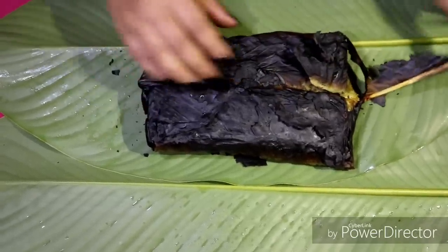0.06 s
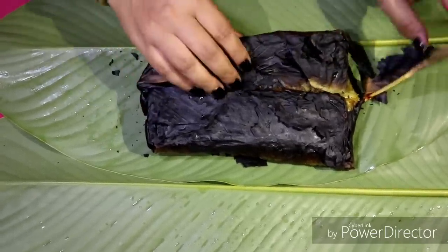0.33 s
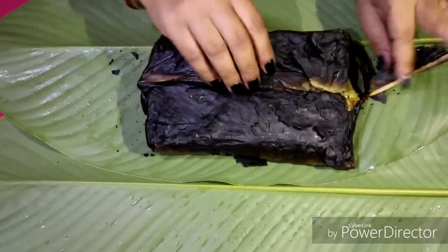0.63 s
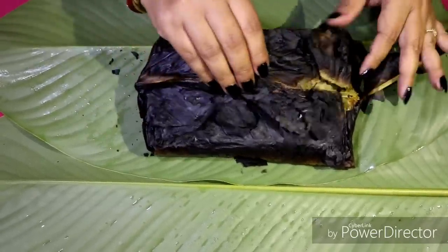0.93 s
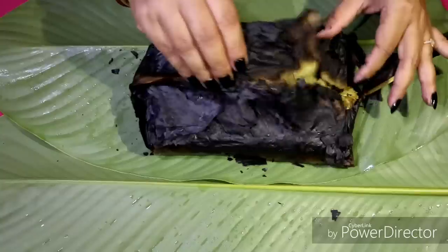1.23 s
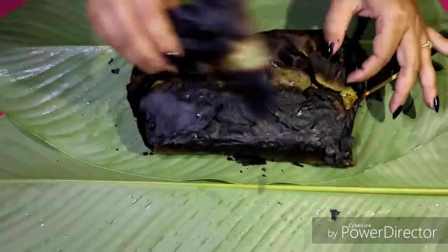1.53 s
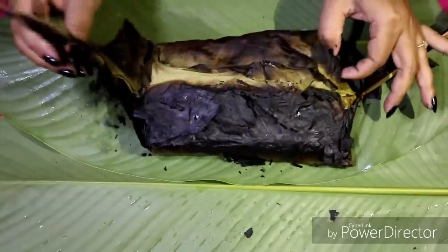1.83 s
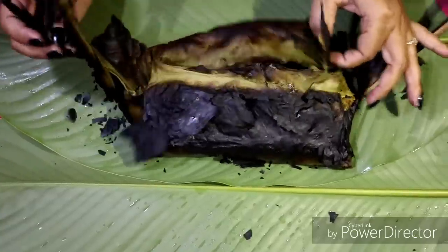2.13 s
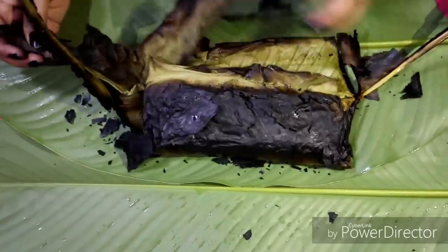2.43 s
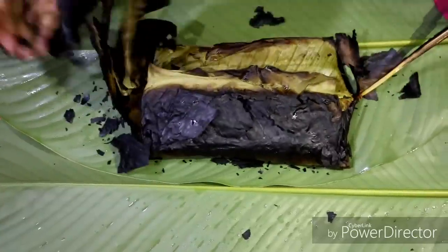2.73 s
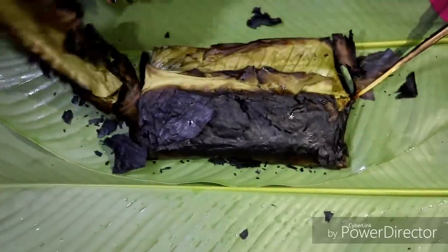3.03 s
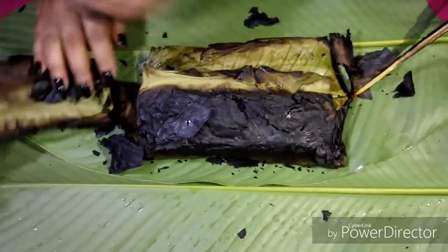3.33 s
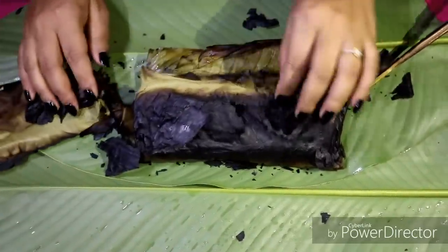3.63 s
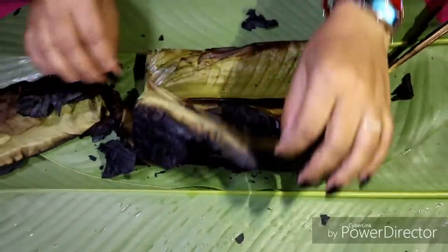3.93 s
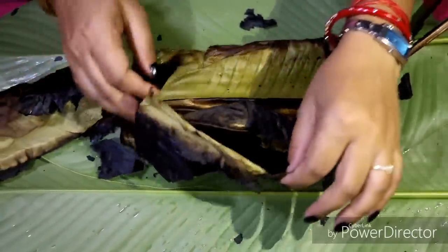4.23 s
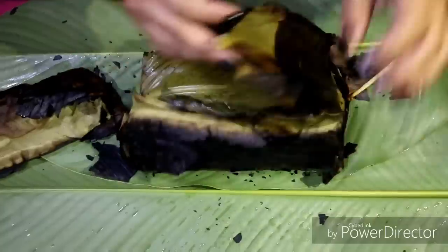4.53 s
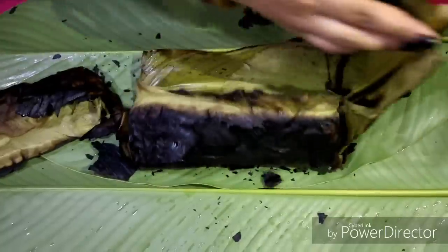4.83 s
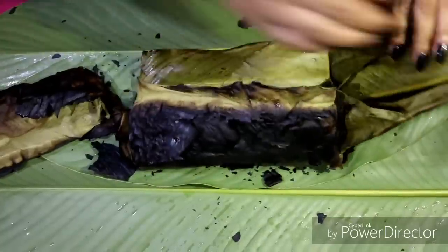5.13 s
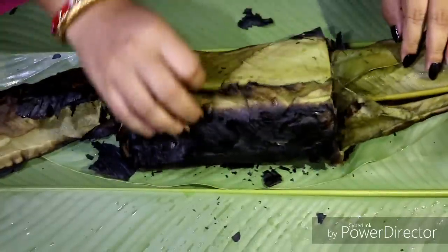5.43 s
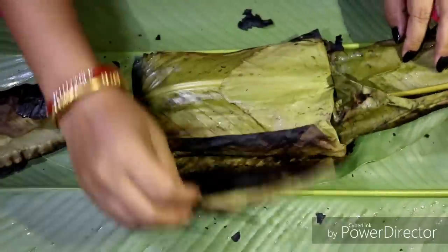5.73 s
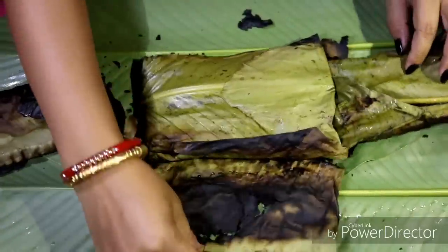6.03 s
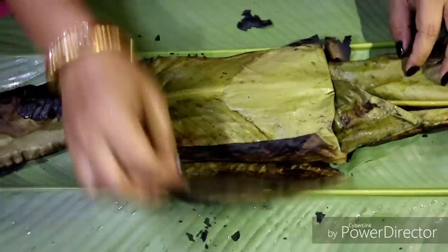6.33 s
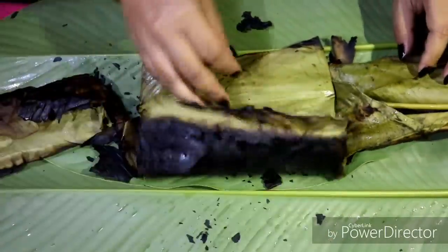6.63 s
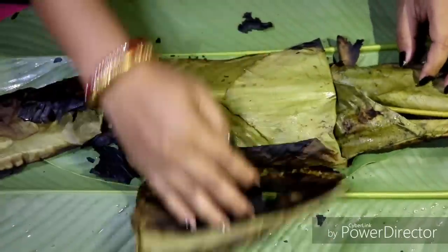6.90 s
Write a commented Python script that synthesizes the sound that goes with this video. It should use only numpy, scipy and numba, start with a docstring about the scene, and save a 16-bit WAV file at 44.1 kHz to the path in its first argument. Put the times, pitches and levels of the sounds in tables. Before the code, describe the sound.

Brittle charred leaves crackle and snap in uneven bursts as a parcel is unwrapped by hand, heard from close by. The first few seconds are busy with crisp tearing and crunching; lighter leaf scrapes and dull little knocks follow, then another bout of crackling near the end. The small kitchen adds very little echo, only a quiet hiss, a faint low hum and a very high insect-like pulse.

```python
"""Peeling a charred leaf parcel

Hands peel the charred leaf wrapping off a roasted parcel, close to a phone in a kitchen. Each pull
sets off a crackle of tiny fractures while the limp inner leaves rub; folds crunch, flakes snap, loose
leaves scrape and the parcel bumps. A small room answers faintly, over steady hiss, a low hum that
swells twice and a thin pulsing chirp."""
import sys
import numpy as np
from scipy import signal
from scipy.fft import rfft, irfft, next_fast_len
from scipy.io import wavfile
from scipy.ndimage import uniform_filter1d
from numba import njit

SR = 44100
rng = np.random.default_rng(int(sys.argv[2]) if len(sys.argv) > 2 else 0)


def transcribe(signal):
    """Save signal, clipped to [-1, 1], as a 16-bit WAV file at the path in sys.argv[1]."""
    frames = np.atleast_2d(signal).T
    limited = np.clip(frames, -1, 1)
    pcm = np.round(limited * 32767).astype(np.int16)
    wavfile.write(sys.argv[1], SR, pcm)


N = 315888
GRAIN = 1024  # samples in one fracture
SIDES = np.array([[1], [-1]])  # left, right
FLAKE_HZ = 3280  # pitch of a typical flake

# single flakes breaking off: (time [s], level [dB], pitch [Hz], ring strength [dB], treble [dB])
SNAPS = [(0.049, -31.5, 4500, 12, -3), (0.2858, -17, 2230, 10, -4), (0.3446, -17.5, 3880, 0, 0),
         (0.355, -15.5, 3490, -6, 12), (0.363, -20, 9500, 8, 11), (.3988, -25, 6100, 11, 3),
         (.43, -27, 4500, -2, 4), (.463, -31, 3000, 0, 0), (.5141, -42, 5500, 3, 8),
         (0.441, -22, 2560, 11, 9), (0.6365, -24.5, 2060, 9, 7), (.716, -31, 7500, 8, 8),
         (0.7282, -25, 4150, 10, 6), (0.7502, -26, 2960, 9, 0), (0.813, -27, 7000, 4, 8),
         (0.8391, -17.5, 3020, 5, -12), (0.872, -31, 2900, 12, -3), (.9465, -28, 3500, 4, -6),
         (0.994, -22, 1400, 13, 1), (0.999, -21, 4000, -3, -2), (1.006, -21.5, 3060, 9, -4),
         (1.041, -27, 3600, 8, -7), (1.0533, -19, 8400, 10, -1), (1.106, -29, 2240, 8, -3),
         (1.1412, -21.5, 6240, 4, 2), (1.1673, -19.5, 8100, 3, 2), (1.1798, -21.5, 4560, 2, 9),
         (1.248, -22, 7500, 17, 6), (1.3496, -24.5, 4780, 4, 5), (1.4451, -19, 2050, 4, -9),
         (1.4951, -26, 7960, 0, 13), (1.5484, -18, 8000, 10, 9), (1.5804, -25, 7900, 15, 8),
         (1.6, -32, 3820, 9, 12), (1.644, -30.5, 5500, 19, -14), (1.674, -24.5, 7400, 9, -1),
         (1.712, -19.5, 3580, 27, 11), (1.721, -18, 8180, -10, 19), (1.7645, -24, 4000, 11, -2),
         (1.8, -24, 4000, -3, 9), (1.8257, -24, 4400, 6, 1), (1.835, -22, 4180, 12, 7),
         (1.8642, -25, 5340, 0, 9), (1.9386, -34, 3420, 7, -1), (1.9697, -16, 3730, 10, -1.5),
         (2.0014, -17.5, 3800, 17, 0), (2.1392, -12.5, 4700, 5.5, -2), (2.2426, -22.5, 1390, 6, -11),
         (2.2842, -27.5, 2300, 6, -8), (2.29, -29.5, 1510, 13, -2), (2.3092, -29, 4400, 4, 7),
         (2.411, -31, 3180, 4, -3), (2.4606, -27, 4560, 7, 7), (2.535, -30, 2170, 10, -10),
         (2.564, -20, 2920, 8, -2), (2.5765, -20, 2180, 16, 0), (2.663, -31, 4500, 5, -4),
         (2.701, -30, 7490, -9, 0), (2.7058, -23, 4500, 11, 9), (2.7555, -14.5, 7700, 2, 9),
         (2.846, -28.5, 8000, 0, 11), (2.8807, -28, 4500, 7, 4), (2.894, -21, 8000, 5, 7),
         (2.9787, -24, 5240, 13, -5), (3.0338, -18, 4600, 10, -5), (3.062, -19, 4600, 14, -3),
         (3.106, -21, 5030, 15, 6), (3.108, -20, 7750, -4, 3), (3.1153, -29, 7000, 1, 10),
         (3.149, -28, 4200, 6, 5), (3.161, -22.5, 5000, 8, 7), (3.166, -23, 5350, 12, 7),
         (3.2687, -21.5, 4700, 11, -2), (3.3112, -24.5, 5700, 10, -11), (3.4392, -26, 4610, 12, -6),
         (3.2903, -30, 2500, -2, -2), (3.333, -27, 4440, 16, 1), (3.357, -31.5, 2000, 4, 1),
         (3.3748, -40, 3500, 2, -9), (3.3869, -30.5, 4500, 5, 14), (3.4733, -26, 3030, 17, -12),
         (3.512, -27.5, 2500, 7, -7), (3.6022, -22.5, 1700, 18, -3), (3.6118, -22.5, 4850, 17, 4),
         (3.6286, -30, 2000, 3, 7), (3.642, -35, 3500, 0, 3), (3.6635, -30.5, 3500, -6, -3),
         (3.731, -29.5, 2140, 15, 0), (3.816, -31, 3500, 6, -4), (3.8847, -20, 4690, 9, 10),
         (3.938, -23, 4770, 14, 2), (3.953, -28, 1630, 15, 2), (3.983, -30, 2000, 3, 0),
         (3.9996, -23, 2690, 6, 5), (4.0285, -20.5, 4870, 9, -7), (4.0788, -24, 4150, 9, 2),
         (4.1392, -30, 7000, 14, 0), (4.333, -27.5, 4440, 21, -2), (4.7626, -31, 4560, 9, 6),
         (4.779, -23, 3660, -13, -13), (4.8205, -30, 8000, 2, 4), (4.8298, -31, 5340, 3, 1),
         (4.884, -24, 5860, 4, 4), (4.9206, -25.5, 4520, 4, -7), (4.945, -25.5, 3430, 8, 5),
         (4.9937, -26, 3300, 12, 0), (5.007, -32, 3000, 10, -7), (5.0434, -23, 3450, -5, 4),
         (5.0507, -24.5, 3140, 0, -9), (5.1221, -20, 6850, 11, 7), (5.1583, -35, 3400, 3, -2),
         (5.181, -33, 3400, 6, -5), (5.2699, -27.5, 3600, 1, -4), (5.4089, -31, 2970, -6, -9),
         (5.4207, -30, 4560, 1, -1), (5.4981, -18, 2840, 7, -10), (5.507, -30, 3500, 1, -2),
         (5.58, -27.5, 3000, -1, 1), (5.5168, -22, 2760, 7, 2), (5.556, -27.5, 2870, 15, -15),
         (5.6171, -18.5, 2160, 15, -18), (5.6255, -20, 2250, 12, -10), (5.7968, -25, 1370, 16, -6),
         (5.8255, -25, 2950, 2, -3), (5.8675, -27, 3000, -5, -2), (5.887, -30, 3500, 4, 2),
         (5.897, -21, 2600, 13, -4), (5.9043, -13.5, 2550, 8.5, -2.5), (5.954, -22, 2630, -9, -6.5),
         (5.975, -21, 3280, 8, 5), (5.986, -20.5, 3140, 2, -7), (6.037, -28, 3230, 8, -8),
         (6.0421, -24, 2200, 10, -5), (6.0659, -24, 3190, 11, -7), (6.0772, -18, 4200, 9.5, -7),
         (6.1247, -29, 3000, -2, 1), (6.1929, -29.5, 7670, 0, 8), (6.238, -30.5, 1490, 1, -16),
         (6.2713, -26, 2820, 12, -2), (6.321, -32, 1800, -1, -12), (6.3941, -27, 1350, 19, -5),
         (6.441, -34.5, 3320, 9, -5), (6.565, -30, 2700, 20, 0), (6.5883, -27.5, 2720, 8, -1),
         (6.686, -23, 8300, 10, 7), (6.7197, -29.5, 8050, 21, 5), (6.91, -32, 2000, 9, -14),
         (6.9694, -31, 2500, 0, -1), (7.0228, -29, 3000, 7, 0), (7.0289, -25, 3140, 9, -2),
         (7.0482, -23, 3530, -1, -2), (7.0613, -22.5, 3920, 3, -4), (7.0683, -24.5, 4000, 8, 2),
         (7.107, -24.5, 8100, 14, 9), (7.1147, -22.5, 4960, 16, 12), (7.138, -26, 3070, 24, -12),
         (7.146, -24.5, 3000, 13, -18)]
# tone colour of the leaves: (frequency [Hz], level [dB])
LEAF_SPECTRUM = [(59, -42), (100, -12), (150, -8), (373, -12), (433, -8), (930, -7), (2580, -1), (3540, 0),
                 (6020, -6), (7940, -4), (9020, -8), (12700, -11), (15000, -14.5), (16000, -23)]


def undb(db):
    """Decibels to gain."""
    return 10 ** (np.asarray(db) / 20)


def unit(x):
    """Scale to rms 1."""
    return x / np.sqrt(np.mean(x ** 2) + 1e-20)


def freqs(size):
    """Frequencies of a spectrum, the first kept above zero."""
    return np.maximum(np.arange(size // 2 + 1) * SR / size, 1)


def shape(points, hz):
    """Gain of a (frequency [Hz], level [dB]) curve at the given frequencies."""
    at, db = np.transpose(points)
    return undb(np.interp(np.log(hz), np.log(at), db))


def causal(gain):
    """Minimum-phase spectrum with this gain: sharp attack, ringing after."""
    cepstrum = irfft(np.log(gain + 1e-6))
    half = len(cepstrum) // 2
    cepstrum[1:half] *= 2
    cepstrum[half + 1:] = 0
    return np.exp(rfft(cepstrum))


def resonance(hz, centre_hz, q):
    """Gain of one damped mode."""
    return 1 / np.sqrt(1 + (q * (hz / centre_hz - centre_hz / hz)) ** 2)


def wander(rate_hz):
    """Random modulation: glides from value to value, spread near 1."""
    return np.interp(np.arange(N) / SR * rate_hz, np.arange(2048), rng.standard_normal(2048))


def envelope(start, length, attack_s=0.018, release_s=0.011):
    """Rise, hold, die away; by default as quick as a pull of the hand."""
    t = np.arange(N) / SR - start
    return np.clip(t / attack_s, 0, 1) * np.exp(-np.clip((t - length) / release_s, 0, 20))


def mic_pair(mid, side, hz, bass_width, wide_hz=5400, lag_s=.00002):
    """Spectra at two close microphones: narrow bass, wide treble, the left a little late."""
    width = np.clip(bass_width + (1 - bass_width) * hz ** 2 / (hz ** 2 + wide_hz ** 2), 0, 1)
    delay = np.exp(-1j * np.pi * hz * lag_s * SIDES)
    return (mid + SIDES * width * side) / np.sqrt(1 + width ** 2) * delay


def room_tone(level_db=-43.3):
    """The steady hiss of the kitchen."""
    # colour of the room noise: (frequency [Hz], level [dB])
    colour = [(25, -26), (50, -16.5), (110, -4.5), (320, -6), (480, -10.5), (900, -18), (2200, -13.5),
              (2950, -4.5), (3400, -3.5), (4200, -12), (5300, -4), (7000, -21), (11300, -11),
              (12400, -18.5), (15200, -17), (15900, -40)]
    size = next_fast_len(N, real=True)
    hz = freqs(size)
    mid, side = rfft(rng.standard_normal((2, size)))
    spectrum = mic_pair(mid, side, hz, bass_width=0.49, wide_hz=4400) * shape(colour, hz)
    return unit(irfft(spectrum, size)[:, :N]) * undb(level_db)


def hum(pitch_hz=147.4, drift=0.011, floor_db=-66, waver_db=2):
    """A low, wavering hum that swells twice, as of a motor far away."""
    # swells of the hum: (start [s], length [s], level [dB])
    swells = [(5.55, 0.23, -57), (6.32, 0.29, -58.5)]
    phase = 2 * np.pi * np.cumsum(pitch_hz * (1 + drift * wander(9))) / SR
    gain = undb(floor_db)
    for start, length, db in swells:
        gain = gain + undb(db) * envelope(start, length, attack_s=0.12, release_s=0.24)
    return np.sqrt(2) * np.sin(phase) * gain * undb(waver_db * wander(12))


def chirp(pitch_hz=12500, level_db=-46, pulse_hz=7.297, first_s=.124, half_s=0.03, waver_db=6.0):
    """A thin, very high chirp in even pulses, as of a bush cricket outside."""
    size = next_fast_len(N, real=True)
    band = resonance(freqs(size), pitch_hz, q=8) ** 2
    rasp = unit(irfft(rfft(rng.standard_normal((2, size))) * band, size)[:, :N])
    cycles = (np.arange(N) / SR - first_s) * pulse_hz
    from_peak_s = ((cycles + .5) % 1 - .5) / pulse_hz
    return rasp * np.exp(-(from_peak_s / half_s) ** 2) * undb(level_db + waver_db * wander(8.8))


def room(x, t60=0.11, wet_db=-16.0, damp_hz=6000, predelay_s=.005):
    """The kitchen walls return a faint, short, duller tail."""
    t = np.arange(SR // 2) / SR
    tail = rng.standard_normal((2, len(t))) * np.exp(-np.log(1000) * t / t60) * (t > predelay_s)
    tail = signal.sosfilt(signal.butter(1, damp_hz, fs=SR, output="sos"), tail)
    tail = unit(tail) / np.sqrt(len(t))
    return x + undb(wet_db) * signal.oaconvolve(x, tail, axes=1)[:, :N]


def fracture(gain, t60, rise_s=0.00095, tail_db=-26, tail_t60=1.0, uneven=0.72, click=0, ring=1):
    """One break: a run of micro-cracks rings the flake, then scatters, unpitched, off nearby leaves."""
    t = np.arange(GRAIN) / SR
    cracks = rng.standard_normal((2, GRAIN))
    cracks *= np.exp(uneven * np.clip(rng.standard_normal(GRAIN), -2, 2))
    cracks *= np.minimum(t / rise_s, 1) ** 2
    fall = -np.log(1000) * np.maximum(t - rise_s, 0)
    run = cracks * np.exp(fall / t60)
    run[[0, 1], [0, 2]] += click * rng.choice([-1, 1], 2)  # a brittle flake starts with one clean crack
    scatter = cracks * undb(tail_db) * np.exp(fall / tail_t60)
    mid, side = rfft(run) * causal(gain * ring) + rfft(scatter) * causal(gain)
    return irfft(mic_pair(mid, side, freqs(GRAIN), bass_width=0.29))


def place(out, s, grain, db):
    """Mix in one grain, its level taken as if its energy fell within 7.5 ms."""
    rms = np.sqrt((grain ** 2).sum(axis=1, keepdims=True) / (.0075 * SR))
    start = int(s * SR)
    out[:, start:start + GRAIN] += grain / rms * undb(db)


@njit
def shower(starts, sizes, picks, flakes):
    """Every crack sounds one of the flakes, at its own moment and size."""
    out = np.zeros((2, N + GRAIN))
    for k in range(len(starts)):
        for ear in range(2):
            for i in range(GRAIN):
                out[ear, starts[k] + i] += sizes[k] * flakes[picks[k], ear, i]
    return out[:, :N]


def crackle(band_hz, per_s, spread_db, t60, clumps_db, ring_db, window=2200, count=160):
    """A shower of tiny fractures in one size of flake: many faint ones, a few strong."""
    hz, (low_hz, high_hz) = freqs(GRAIN), band_hz
    gain = shape(LEAF_SPECTRUM, hz) / np.sqrt((1 + (low_hz / hz) ** 6) * (1 + (hz / high_hz) ** 6))
    flakes = []
    for pitch_hz in np.geomspace(low_hz, high_hz, count):
        ring = np.hypot(1, undb(ring_db) * resonance(hz, pitch_hz, q=9))
        flakes.append(fracture(gain, t60, rise_s=0.00014, tail_db=-8, tail_t60=0.11, ring=ring))
    starts = np.flatnonzero(rng.random(N) < per_s / SR)
    sizes = undb(spread_db * np.minimum(rng.exponential(size=N), 4) + clumps_db)
    sizes *= rng.choice([-1, 1], N)
    picks = rng.integers(0, count, N)
    out = shower(starts, sizes[starts], picks[starts], np.array(flakes))
    # a steady pull releases a steady amount of energy, however it is shared among the cracks
    return out / np.sqrt(uniform_filter1d((out ** 2).mean(axis=0), size=window) + 1e-12)


def bumps(trim_db=2, q=1.4):
    """The soft parcel knocks dully as it shifts under the hands."""
    # knocks on the leaf mat: (time [s], level [dB], pitch [Hz])
    knocks = [(.356, -48, 297), (0.839, -38, 476), (.945, -39, 600), (1.002, -50, 306), (1.17, -49, 277),
              (1.447, -46, 250), (2.181, -42.5, 297), (2.575, -38.5, 520), (2.722, -35.5, 484),
              (2.894, -44, 305), (3.06, -31.5, 1150), (3.064, -46, 238), (3.289, -43, 440),
              (3.88, -43.5, 600), (4.027, -47, 322), (4.278, -40, 680), (4.54, -35.5, 820),
              (4.655, -44.5, 660), (4.782, -37.5, 614), (4.926, -44, 666), (5.621, -47.5, 237),
              (5.958, -45, 710), (7.052, -48, 704), (7.14, -45, 237)]
    out, hz = np.zeros((2, N + GRAIN)), freqs(GRAIN)
    for s, db, pitch_hz in knocks:
        knock = fracture(resonance(hz, pitch_hz, q) ** 2, t60=0.028, rise_s=0.0016)
        place(out, s, knock, db + trim_db)
    return out[:, :N]


def scrapes(spread=1.07):
    """A sliding leaf catches in quick little jerks that ring one narrow hollow."""
    # a loose leaf drags across its neighbour: (start [s], length [s], level [dB], hollow pitch [Hz])
    drags = [(2.37, .055, -40, 2300), (2.992, 0.67, -48.5, 1360), (4.48, 0.24, -46.5, 1760),
             (4.86, .4, -51, 3380)]
    out = np.zeros((2, N))
    for start, length, db, hz in drags:
        jerks = crackle((hz / spread, hz * spread), per_s=500, spread_db=1.0, t60=0.022,
                        clumps_db=0, ring_db=20, count=24)
        out += undb(db) * envelope(start, length) * jerks
    return out


def crumbs(below_snap_db=20, fade_s=.007):
    """Power of rub, crackle and char as the leaf crumbles after each snap."""
    bursts = np.zeros(N)
    for s, db, *_ in SNAPS:
        bursts[int(s * SR)] += undb(db - below_snap_db) ** 2
    fading = signal.lfilter([1], [1, -np.exp(-1 / (fade_s * SR))], bursts)
    return fading * undb([[-9], [0], [-2]]) ** 2


def crunches():
    """Power of rub, crackle and char as folds give way: avalanches of cracks that swell and die."""
    # folds crushed or ripped: (time [s], half length [s], level [dB], rub share [dB], char share [dB])
    folds = [(0.36, 0.0082, -25, -7, -4), (0.448, 0.012, -29.5, -11, 1), (0.837, 0.018, -28, -15, 0.5),
             (0.951, 0.029, -31.5, -21, -0.5), (1.29, 0.011, -25.5, -8.5, -1),
             (1.448, 0.0057, -23, -18, 5.5), (1.554, 0.005, -36.5, -8, 9.5),
             (1.908, 0.0036, -24.5, -11, 1.5), (2.059, 0.0077, -32.5, 0, 5),
             (2.183, 0.0088, -28.5, -8.5, -3), (2.57, 0.015, -26, -9, -1.5), (2.758, 0.0037, -29.5, -2, 16),
             (2.929, 0.0079, -28.5, -3, 2.5), (3.026, 0.013, -38, -6, -3), (3.059, 0.0074, -29.5, -11, 1),
             (3.159, 0.0063, -35.5, -4, 7), (4.374, 0.0063, -31, -2, -1), (4.543, 0.0082, -35, -6, 2),
             (4.782, 0.0041, -32.5, -1, 8.5), (5.048, 0.0037, -31, -7, -4), (5.483, 0.0037, -31, -16, 0),
             (5.868, 0.0065, -29.5, -6, -0.5), (5.913, 0.0056, -28.5, -3, -1), (6.695, 0.021, -34, -10, -8),
             (7.067, 0.02, -33.5, -12, -6)]
    power, t = np.zeros((3, N)), np.arange(N) / SR
    for s, half_s, db, rub_db, char_db in folds:
        near = slice(max(int((s - .08) * SR), 0), int((s + .08) * SR))
        swell = np.exp(-((t[near] - s) / half_s) ** 2)
        power[:, near] += undb(db + np.array([[rub_db], [0], [char_db]])) ** 2 * swell
    return power


def hand_effort(land_s=.23, graze_db=-5.5, build_db=1):
    """Power of rub, crackle and char: a light touch throughout, and pulls that tighten and let go."""
    # fingers on the parcel between pulls: (rub [dB], crackle [dB], char [dB])
    touch_db = [-57, -48.5, -50.5]
    # pulls at the wrapping: (start [s], length [s], crackle [dB], rub share [dB], char share [dB])
    pulls = [(0.234, 0.29, -43, -15.5, -8), (0.585, 0.054, -40.5, -13.5, -2), (0.708, 0.097, -40, -25, -9),
             (0.778, 0.31, -35, -13, 0.5), (1.104, 0.27, -32.5, -13, -1), (1.35, 0.16, -36.5, -25, -12),
             (1.688, 0.1, -30, -19, -3), (1.619, 0.075, -38, -19, 0.5), (1.794, 0.16, -36.5, -19.5, -6.5),
             (1.97, 0.049, -34.5, -22, -3), (2.016, 0.2, -33.5, -12, -4.5), (2.259, 0.18, -37, -16, -2),
             (2.438, 0.094, -39.5, -13, -2.5), (2.546, 0.22, -34.5, -14, -2.5),
             (2.82, 0.14, -41, -9.5, 2.5), (3.042, 0.16, -37.5, -20, -4), (3.186, 0.059, -38, -10.5, -6),
             (3.273, 0.36, -38.5, -14.5, -6), (3.708, 0.19, -43, -14, -6), (3.92, 0.039, -32.5, -12, 0),
             (4.286, 0.11, -37, -10, -4), (4.366, 0.53, -53, -1, 5.5), (5.017, 0.28, -47.5, -9, -16),
             (5.437, 0.27, -44.5, -11, -8), (5.762, 0.16, -40.5, -10, -6), (5.956, 0.3, -39, -15, -5.5),
             (6.055, 0.083, -30.5, -14.5, -9), (6.43, 0.43, -50.5, -5, -2), (6.938, 0.26, -39, -13.5, -9),
             (7.083, 0.09, -30.5, -17, -14)]
    t = np.arange(N) / SR
    power = undb(touch_db)[:, None] ** 2 * np.ones(N)
    # the fingers only graze the leaves before they land
    power[:2] *= np.interp(t, [land_s, land_s + 0.018], [undb(graze_db) ** 2, 1])
    for start, length, db, rub_db, char_db in pulls:
        tightening = undb(build_db * (np.clip((t - start) / length, 0, 1) - .5))
        pull = tightening * envelope(start, length)
        power += (undb(db + np.array([[rub_db], [0], [char_db]])) * pull) ** 2
    return power


def peeling(effort, rub_db=4.0, dry_db=-0.76, char_db=0.8, light_pull_db=-49.5):
    """Limp leaf rubs dully, dry leaf crackles, and its burnt skin crumbles in fine ticks."""
    power = effort * undb([[rub_db], [dry_db], [char_db]]) ** 2
    # under a light pull the dry crackle thins to lone ticks, with stillness between them
    tick_power = power[1] / (1 + effort[1] / undb(light_pull_db) ** 2)
    power[1] -= tick_power
    power += crunches() + crumbs()
    slip_db = 2.5 * wander(170)  # the leaf catches and slips, in all layers at once
    rub = crackle((380, 1600), per_s=900, spread_db=4.5, t60=0.0072, clumps_db=slip_db, ring_db=6)
    dry = crackle((1700, 6200), per_s=850, spread_db=4.7, t60=0.004, clumps_db=slip_db, ring_db=9)
    char = crackle((6000, 15900), per_s=1900, spread_db=5.5, t60=0.006, clumps_db=slip_db, ring_db=4.5)
    sparse = dict(clumps_db=slip_db, window=22000)  # slow levelling keeps the gaps open
    ticks = crackle((1400, 6000), per_s=130, spread_db=3.5, t60=0.007, ring_db=11, **sparse)
    # creases buckle now and then, each with a brief pitch of its own
    crinkles = crackle((900, 5500), per_s=64, spread_db=6, t60=0.008, ring_db=12, **sparse)
    # the soft filling gives under the fingers
    thuds = crackle((180, 480), per_s=90, spread_db=5, t60=0.015, ring_db=-13, count=40, **sparse)
    out = (np.sqrt(power)[:, None] * np.array([rub, dry, char])).sum(axis=0)
    out += ticks * np.sqrt(tick_power) * undb(-4.5)
    out += crinkles * np.sqrt(effort[1]) * undb(-9)
    return out + thuds * np.sqrt(effort[0]) * undb(-11)


def chips(power, per_s=22, level_db=-38, spread_db=5, typical_pull_db=-39.5, follow=0.61):
    """Lesser flakes come off at random, louder as the pull is harder; rows like those of SNAPS."""
    at = np.flatnonzero(rng.random(N) < per_s / SR)
    loudness, octaves = np.clip(rng.standard_normal((len(at), 2)), -2, 2).T
    levels = level_db + follow * (10 * np.log10(power[at]) - typical_pull_db) + spread_db * loudness
    ring_db, treble_db = 5, -4
    return [(s, db, hz, ring_db, treble_db) for s, db, hz in zip(at / SR, levels, FLAKE_HZ * 2 ** octaves)]


def snaps(flakes, trim_db=-3.5, body_hz=1200, treble_hz=6200):
    """Flakes break off with a brief ring: small brittle ones thin, large ones full and damped."""
    # deeper layers shed thicker flakes with more bass: (time [s], low cut [Hz])
    depth = [(0.3, 1350), (0.8, 593), (2.6, 560), (3.1, 405), (7.1, 433)]
    out, hz = np.zeros((2, N + GRAIN)), freqs(GRAIN)
    lows = 1 / (1 + (hz / body_hz) ** 4)
    highs = 1 / (1 + (treble_hz / hz) ** 4)
    for s, db, pitch_hz, ring_db, treble_db in flakes:
        low_cut_hz = np.interp(s, *np.transpose(depth))
        leaf = shape(LEAF_SPECTRUM, hz) / np.hypot(1, (low_cut_hz / hz) ** 2)
        # smaller, higher flakes have less body, and so have those burnt more brittle
        body_db = -4 - 2 * np.log2(pitch_hz / FLAKE_HZ) - 0.72 * treble_db
        shelves = undb(lows * body_db + highs * (treble_db + 1.5))
        q = 10 * min(pitch_hz / FLAKE_HZ, 1) ** 1.4
        ring = np.hypot(1, undb(ring_db + 1) * resonance(hz, pitch_hz, q))
        click = np.interp(db, [-30, -15], [4, 8.5])  # louder snaps have a harder attack
        place(out, s, fracture(leaf * shelves, t60=.0105, click=click, ring=ring), db + trim_db)
    return out[:, :N]


def scene():
    """Crackle, scrapes, bumps and snaps move with the hands, over the kitchen's background."""
    # where the hands work: (time [s], left minus right [dB])
    hands = [(0, -1.7), (1.0, -3.0), (1.8, -2.2), (2.6, -1.4), (3.1, 1.3), (3.7, -1), (4.2, -1),
             (4.8, -2.6), (5.6, -3.8), (6.3, -3.6), (7.16, -2.6)]
    balance_db = np.interp(np.arange(N) / SR, *np.transpose(hands))
    effort = hand_effort()
    leaves = peeling(effort) + scrapes() + bumps() + snaps(SNAPS + chips(effort[1]))
    return room(leaves * undb(SIDES * balance_db / 2)) + room_tone() + hum() + chirp()


def record(dry, top_hz=15850):
    """The phone rounds the highest peaks and cuts the top."""
    return signal.sosfilt(signal.ellip(8, .2, 70, top_hz, fs=SR, output="sos"), np.tanh(dry))


dry = scene()
out = record(dry)
transcribe(out)
```